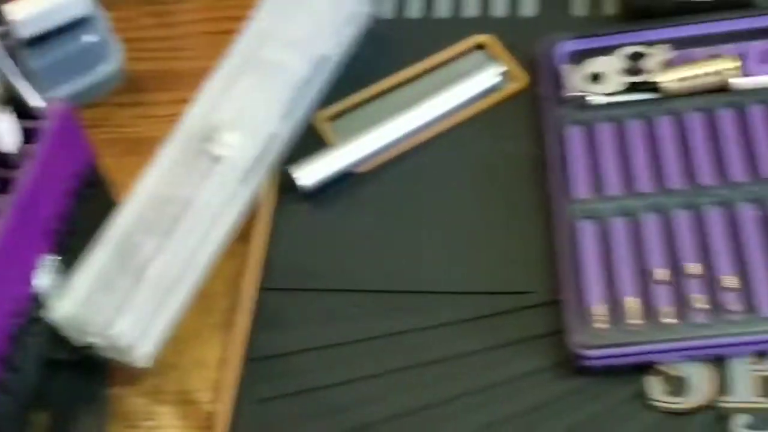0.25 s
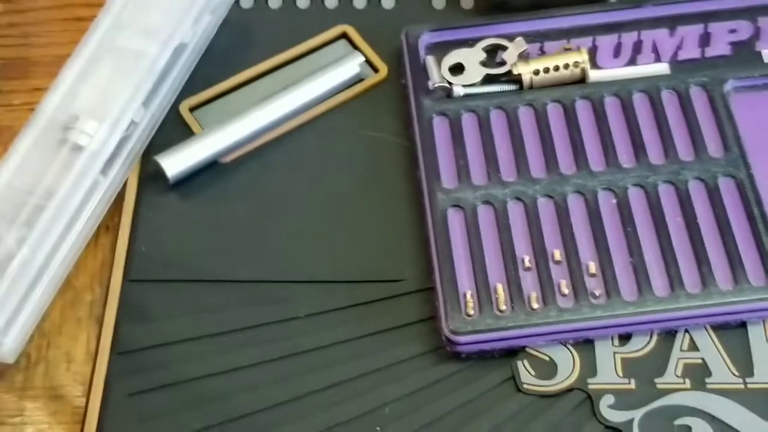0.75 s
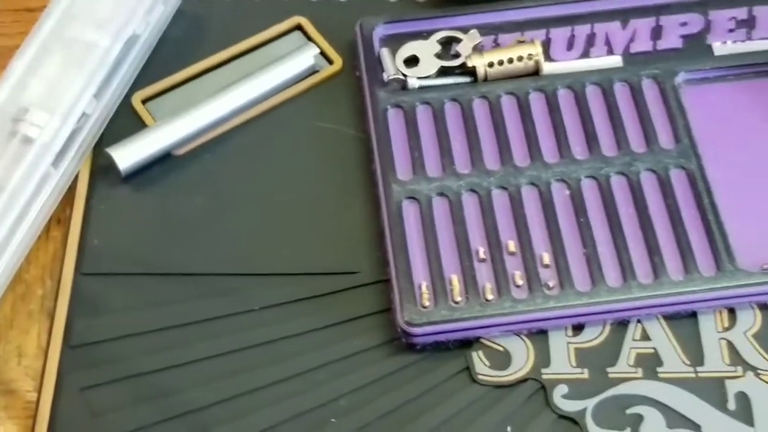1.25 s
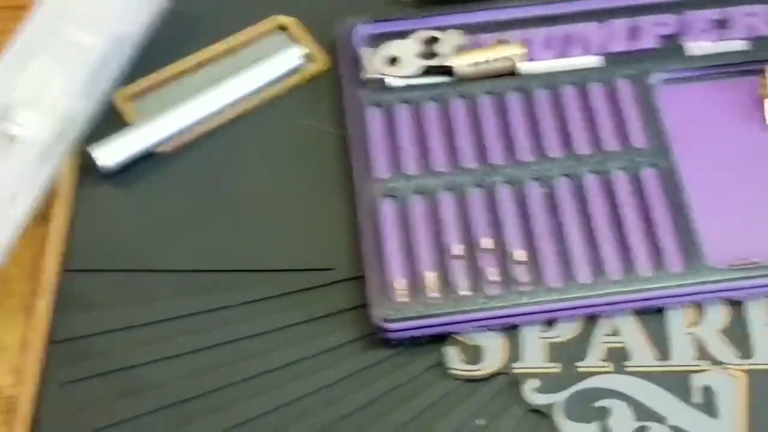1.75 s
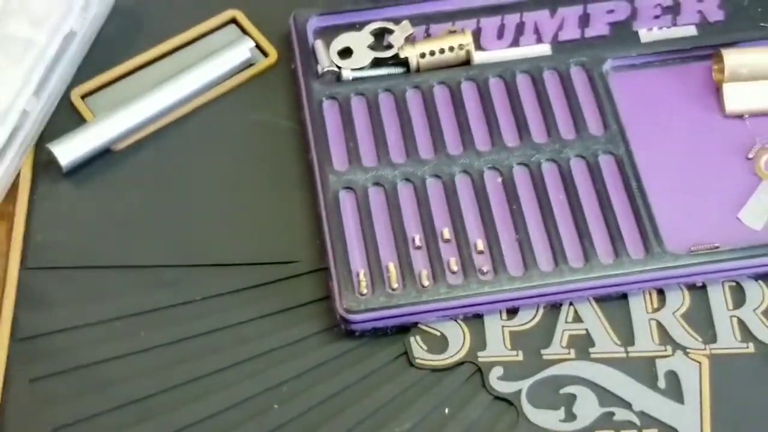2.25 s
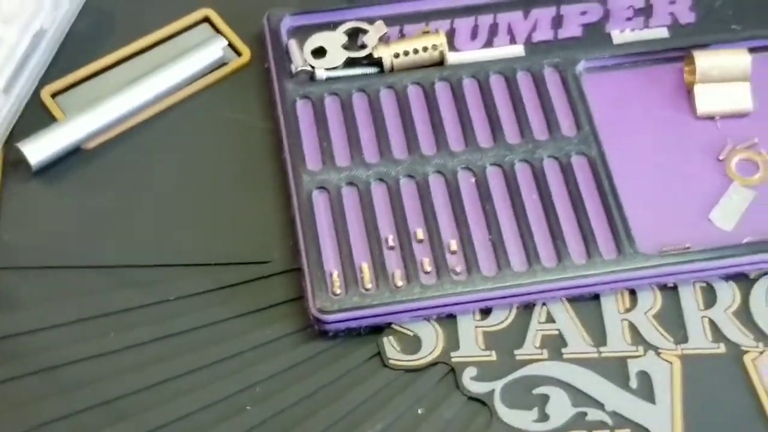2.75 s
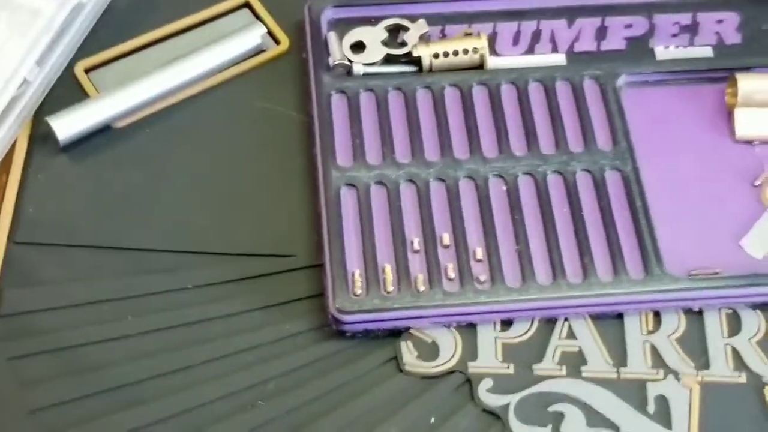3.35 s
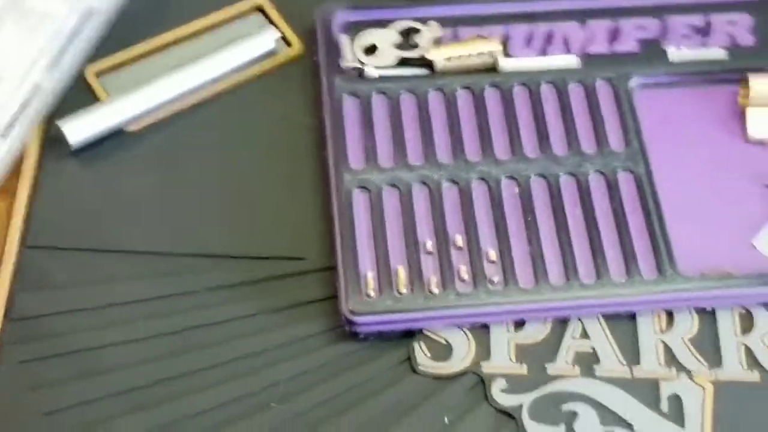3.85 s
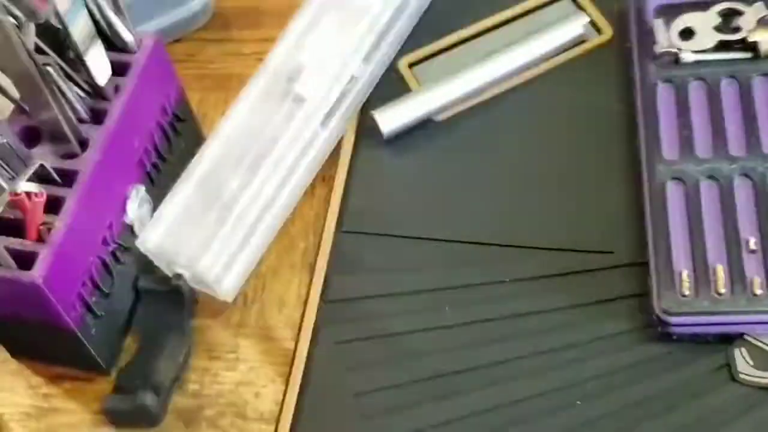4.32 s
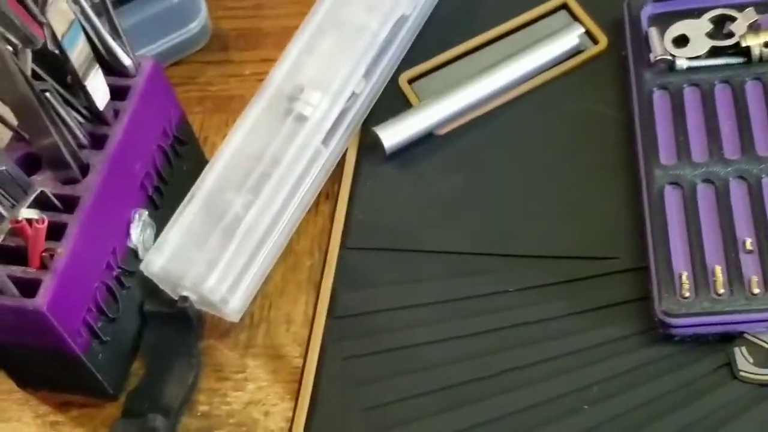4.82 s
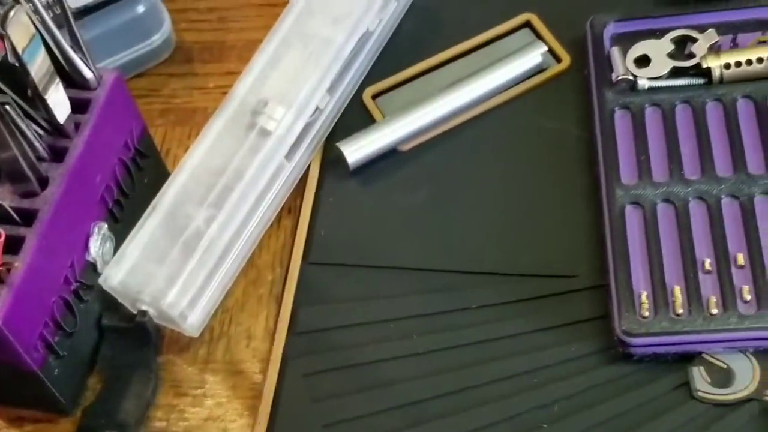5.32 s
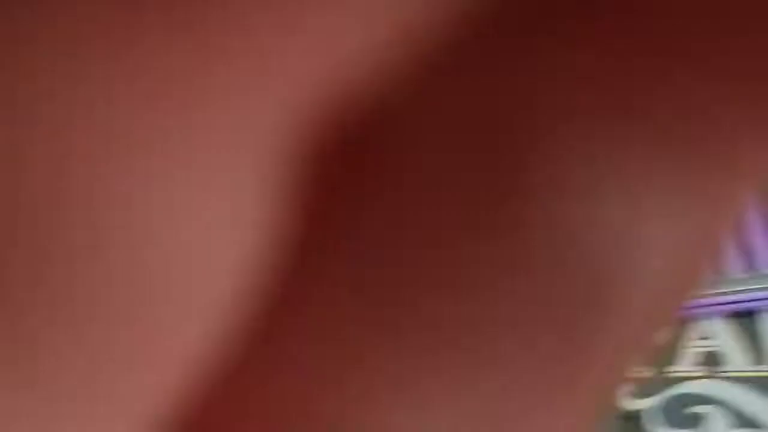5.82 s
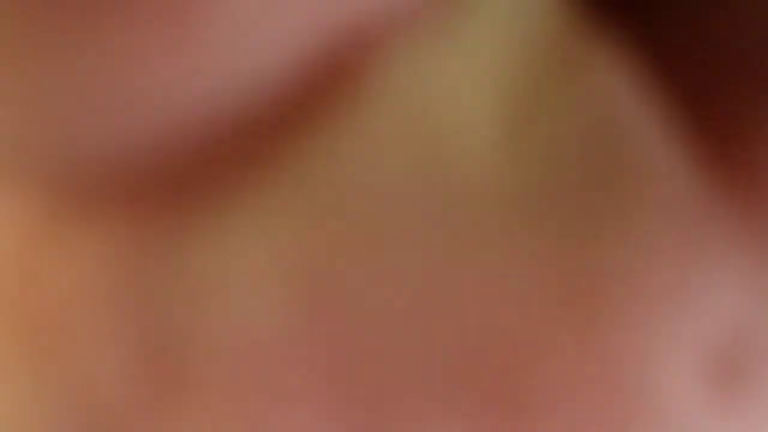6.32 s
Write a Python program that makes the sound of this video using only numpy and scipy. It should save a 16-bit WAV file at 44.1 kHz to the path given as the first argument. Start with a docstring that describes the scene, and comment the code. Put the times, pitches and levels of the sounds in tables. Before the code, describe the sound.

A hook-and-loop strap is peeled open in short, irregular tugs right next to the microphone, heard mostly on the left and only faintly on the right. It starts with light, dry crackling and scattered ticks, and a small creak of a hand on the camera at about 0.9 seconds. The sharpest rip comes at 1.6 seconds, followed by another around 2.2. Short crackles and crisp snaps of single hooks continue near 2.8 to 3.1 seconds, around 4.2 and 4.5, and again near 5.2. From about 5.5 seconds to the end at 6.6, the tearing and snapping get busier. Throughout, fingers shift on the camera body, giving soft, dull knocks, low rumble and rustle, with clearer bumps near 1.2, 1.6 and 5.2 seconds. Underneath is quiet indoor room tone, slight hiss and a very faint high whine.

```python
"""A hook-and-loop strap is peeled open in short tugs beside the left microphone port of a hand-held camera.
Single hooks snap free, and runs of them tear in a dense crackle that rings the taut strap.
The far port, on the right, hears the strap late and much quieter, with its mids scooped out.
The hand shifts, knocks and creaks on the case. Underneath lie low indoor room tone, hiss
and a faint whine near 7 kHz."""
import sys
import numpy as np
from scipy import signal
from scipy.fft import rfft, irfft
from scipy.io import wavfile
from scipy.ndimage import uniform_filter1d

SR = 44100
rng = np.random.default_rng(int(sys.argv[2]) if len(sys.argv) > 2 else 0)


def master_out(mix):
    """Clip the mix to full scale and print it as 16-bit PCM to the path in sys.argv[1]."""
    frames = np.transpose(np.atleast_2d(mix))
    ceiling = np.clip(frames, -1, 1)
    pcm = np.round(ceiling * 32767).astype(np.int16)
    wavfile.write(sys.argv[1], SR, pcm)


N = 290178

# EQ of the room tone: f/Hz, level/dB
ROOM_EQ = [(15, -38.5), (30, 4), (48, -6), (70, -6), (150, -14.5), (300, -13), (400, -45)]
# EQ of the near port: f/Hz, level/dB
NEAR_PORT_EQ = [(150, -47), (250, -10), (414, -15), (747, -10), (1400, -12.5), (1720, -8), (2190, -7.5),
                (3110, -2), (3830, -2.5), (4400, -1.5), (6110, -6), (7150, -5), (8660, -15), (11400, -6),
                (15900, -0.5)]
# EQ of the way round the case to the far port: f/Hz, level/dB
FAR_PORT_EQ = [(200, 12.5), (400, 14.5), (700, -2.5), (1200, -16.5), (2000, 1), (3200, -6.5), (6000, -4),
               (7300, 6.5), (12000, 1.5), (15500, 2)]
# glide of the creak: t/s, f/Hz, level/dB
CREAK_GLIDE = [(.865, 385, -70), (.89, 358, -63), (.91, 284, -59), (.93, 270, -65), (.945, 260, -85)]
# modes of the case: f/Hz, level/dB, t60/s
CASE_MODES = [(99, 0.5, 0.055), (123, -12, 0.07), (259, 4, 0.018), (459, -7, 0.042), (650, -2, 0.015)]
# fingers landing on the case: t/s, level before trim/dB, left over right/dB
FINGER_LANDINGS = [(1.148, -37, 2), (1.221, -36, 3), (1.613, -33, 7), (1.751, -48, 25), (1.81, -48.5, 8),
                   (2.102, -43.5, 18), (2.181, -43, 3), (2.547, -56.5, -1), (3.002, -52, 12),
                   (3.092, -42.5, 11), (3.506, -50, 7), (3.707, -52, 19.5), (4.202, -44, 21),
                   (4.28, -49.5, 12.5), (4.491, -45, 4.5), (4.545, -49.5, 16), (4.89, -58, 10),
                   (5.195, -38.5, 5.5), (5.521, -50.5, 3), (5.731, -63, -8), (5.783, -45.5, 18),
                   (6.133, -40, 13), (6.475, -44.5, -11), (6.539, -42, 11)]
# EQ of the handling rumble: f/Hz, level/dB
RUMBLE_EQ = [(29, -15), (50, 8), (108, 4), (250, -5), (320, -54.5), (550, -120)]
# envelope of the shifting hand: t/s, rumble before trim/dB, rustle re rumble before trim/dB
GRIP_ENVELOPE = [(0.0, -64, 0), (0.48, -82.5, -10), (1.61, -62, 4), (1.92, -70.5, -6), (2.16, -64.5, 0.5),
                 (2.56, -72, -8), (2.99, -68.5, -2.5), (3.32, -78.5, -3.5), (4.21, -66.5, -3),
                 (4.49, -78, -7), (5.31, -68.5, -1.5), (6.03, -69, 1), (6.27, -78, 9), (6.58, -77, 6.5)]
# thud, crackle and fizz bands of a hook: low f/Hz, high f/Hz
HOOK_BANDS = [(400, 1500), (1500, 8500), (8500, 18000)]
# modes of the taut strap: f/Hz, width/Hz, level/dB
STRAP_MODES = [(3050, 300, 4), (3500, 350, 1), (3970, 350, -3), (4700, 400, -4), (6100, 300, -14),
               (7400, 300, -18)]
# tugs, each timed at its hardest: t/s, build-up/s, let-go/s, crackle/dB,
# thud re crackle/dB, fizz re crackle/dB, squeak re crackle/dB, big-hook boost/dB
STRAP_TUGS = [(0,0.05,0.054,-48,8.5,-11,-25,-10.5), (0.08,0.037,0.042,-54,-5.5,0,-8,1),
              (0.2,0.14,0.187,-60,0.5,2,-17.5,-1.5), (0.351,0.048,0.048,-52.5,-4,-5,-27,0),
              (0.465,0.013,0.049,-63,-7,-1,-20,4.5), (0.6,0.031,0.11,-63.5,-6.5,2,-29,3.5),
              (0.719,0.016,0.03,-59.5,-6,1,-20,3), (0.84,0.019,0.021,-45.5,-4.5,-13,-15.5,-5),
              (0.9,0.05,0.028,-64.5,-5,-1,3,-1.5), (1.048,0.1,0.054,-57,-6,2.5,5,-3.5),
              (1.161,0.1,0.048,-56.5,-2.5,-1,4,-3), (1.227,0.019,0.018,-56,6,-16,1,-3),
              (1.32,0.062,0.13,-54,-22,-9,-39,0.5), (1.45,0.037,0.041,-43,-7.5,7,-25,-5.5),
              (1.606,0.033,0.031,-21.5,-23.5,-9,-12,-4.5), (1.66,0.21,0.068,-48,-8.5,15.5,-14,-7.5),
              (1.744,0.11,0.074,-50.5,-3.5,4.5,-0.5,-1), (1.855,0.06,0.037,-45.5,-8.5,-14,8,-5.5),
              (2.031,0.13,0.079,-56,-10,-8,-3,4.5), (2.124,0.055,0.039,-46.5,-17,3.5,-29,1),
              (2.236,0.064,0.065,-31.5,-22,6.5,-12.5,-12), (2.453,0.18,0.05,-56.5,-5.5,-15,6.5,-7),
              (2.53,0.042,0.092,-57.5,-35,-13,-13,-6), (2.651,0.046,0.12,-57.5,-22,0,-12,-4),
              (2.759,0.071,0.13,-47,-14.5,1,-27,-6.5), (2.883,0.027,0.066,-45,-6.5,-12,-22,0),
              (2.958,0.037,0.087,-50.5,-12,-8,-30,3), (3.109,0.073,0.34,-60,-4,-6,-9,5.5),
              (3.269,0.02,0.087,-60.5,-4,-1.5,-1.5,-1.5), (3.36,0.025,0.036,-57,-10,0,-30,2),
              (3.52,0.038,0.062,-45.5,-16.5,-7,-28,-3), (3.64,0.16,0.088,-65.5,-5.5,1,-25,2.5),
              (3.792,0.11,0.06,-56,-12,-2,-29,3.5), (3.922,0.04,0.038,-57.5,-21,2,-24,5),
              (3.98,0.035,0.025,-51,-16,-1,-25,8), (4.12,0.1,0.081,-49.5,-7.5,-3,-20,4.5),
              (4.235,0.034,0.083,-45.5,-3,-3,-22,-2), (4.281,0.04,0.082,-64,-9,-10,-17,3.5),
              (4.537,0.058,0.031,-42.5,-5.5,-4,-17.5,-4), (4.651,0.15,0.066,-67.5,-4,-11.5,-22,-3.5),
              (4.773,0.034,0.056,-46.5,-7,-2.5,-31.5,0.5), (4.86,0.07,0.076,-56.5,-2.5,-3,-20,1),
              (4.96,0.048,0.044,-40.5,-3,-5,-37,-7.5), (5.11,0.067,0.12,-47.5,-5,-16,-27,-6),
              (5.199,0.023,0.029,-43,-19,-17,-30,1.5), (5.29,0.084,0.16,-63,-0.5,-2.5,-27,1.5),
              (5.461,0.086,0.11,-45,-4.5,-2,-28,-1.5), (5.535,0.024,0.039,-44.5,-15,-4,-23,-4),
              (5.68,0.1,0.19,-59.5,-7,-2,-20.5,5.5), (5.791,0.1,0.22,-54.5,-16,-19,-18.5,-3),
              (5.93,0.13,0.18,-51,-7,2.5,-24,5.5), (6.03,0.15,0.053,-49.5,-8,-4,-24,6),
              (6.13,0.1,0.053,-43,-8,-11,-23,-2), (6.199,0.071,0.061,-46,-8.5,-21,-10,-8),
              (6.37,0.042,0.33,-65.5,-6,1.5,-26,6), (6.483,0.031,0.045,-47,-12,-8,-18,2.5),
              (6.565,0.018,0.066,-52,-3,-6,-15,16)]
# floor as the strap creeps between tugs: crackle/dB, thud/dB, fizz/dB, squeak/dB, big hooks/dB
STRAP_CREEP = [-72, -95.5, -73.5, -105, -81]
# single hooks snapping free: t/s, crack peak/dB, thud re crack/dB, fizz re crack/dB, ring f/Hz
HOOK_SNAPS = [(0.0534, -26.5, -36, -2, 2860), (0.087, -35, -17, -14, 3200), (0.138, -28.5, -23, 0, 7500),
              (0.171, -36.5, -9, -17, 3560), (0.3401, -33.5, -1, 11, 3010), (0.3592, -13, -12, -5, 3520),
              (0.3652, -24, -6, 6, 2990), (0.6693, -23, -15, -6, 3130), (1.079, -33.5, -9, 2, 3010),
              (1.3143, -22.5, -11.5, -0.5, 3090), (1.4013, -32, -10, -20, 4830), (1.55, -18, -12, -2, 4260),
              (1.565, -21.5, -21, -10, 2000), (1.5876, -7, -12, -1, 4930), (1.5911, -20, -25, -8, 4600),
              (1.609, 0, -30, -24, 4240), (1.613, -18, -17, -14, 4480), (1.691, -26.5, -4.5, 20, 3180),
              (1.7285, -16.5, -5, -17, 3300), (1.739, -12, -14.5, -1.5, 3340),
              (1.7495, -23.5, -34, -12, 5700), (1.8389, -26.5, -11, -23, 3840),
              (2.1004, -22, -3.5, -13, 2970), (2.1077, -5.5, -12.5, -19, 2850), (2.1109, -16, -9, 2, 3360),
              (2.1413, -20, -11, -15, 3150), (2.2085, -21.5, -16, 7, 7100), (2.2502, -6, -29, -8, 2865),
              (2.561, -38, -12, 6, 4470), (2.6398, -33.5, -15, -7, 4840), (2.752, -11, -33, -7, 3630),
              (2.8679, -21, -16, -10, 4360), (2.8754, -25.5, -11, 10, 4400), (2.8815, -15.5, -21, 2, 2690),
              (2.9152, -31.5, -8, -2, 3680), (2.9476, -29, -7.5, 6.5, 3830), (2.9726, -32.5, -5, 6, 3100),
              (3.022, -11, -7, -1.5, 3060), (3.0991, -9, -3, -6, 3060), (3.1169, -8, -5, -5.5, 3000),
              (3.1565, -32.5, -1, 0, 3380), (3.178, -39, -4, -7, 3570), (3.2245, -26.5, -33, -4, 7740),
              (3.3674, -38.5, -32, 2.5, 4840), (3.4856, -31, -38, -2, 4900), (3.5041, -21, -19, 10, 3770),
              (3.523, -26.5, -6, 9, 2730), (3.5469, -25.5, -23, -5, 4930), (3.6704, -35.5, -28, -13, 5500),
              (3.745, -24, -16.5, 0, 7100), (3.785, -27, -17, 3.5, 6050), (3.9096, -32.5, -38, -7, 5700),
              (3.9739, -23, -15.5, -7, 6260), (4.0284, -15.5, -22, 9.5, 7400), (4.0647, -33, -9, 12, 5680),
              (4.122, -28, -4.5, 9.5, 3760), (4.1259, -22.5, -25, 8, 4830), (4.1716, -15, -10.5, 2.5, 2800),
              (4.207, -21.5, -6.5, 8, 3700), (4.2085, -10, -29, 2, 1640), (4.225, -17, -8, -3, 3220),
              (4.234, -16.5, -15, 10.5, 4470), (4.2465, -26, -5, 5, 2950), (4.288, -9.5, -7, 2.5, 2980),
              (4.34, -37.5, -12, -3, 3000), (4.479, -30.5, -9, -36, 3000), (4.4985, -29, -19.5, -16, 2860),
              (4.5264, -16.5, -10, -3, 3230), (4.5352, -14, -6, -26, 4000), (4.549, -11, -7.5, -4, 3080),
              (4.7111, -40, -37, -4, 4150), (4.7736, -27, -7.5, -14, 4550), (4.8195, -29, -5, -2, 4670),
              (4.8702, -36, -11, -19, 3100), (4.8965, -11.5, -10, 1, 3340), (4.909, -38, -20, 7, 5000),
              (5.1493, -22, -28, -4, 3640), (5.195, -15.5, -46, 3.5, 2480),
              (5.1973, -19.5, -14.5, -1, 2430), (5.2105, -29.5, -21, 4, 2370),
              (5.4309, -24.5, -9.5, -20, 5350), (5.4819, -28, -9, 14.5, 5660), (5.5, -23.5, -13, 3, 3960),
              (5.5254, -21, -5.5, 10, 5500), (5.5454, -17, -14.5, 7, 3630), (5.737, -13, -8.5, 11, 5600),
              (5.7568, -15.5, -20, -2, 8600), (5.7697, -23, -9, -16, 3120), (5.7856, -9, -8, 3.5, 3420),
              (5.7982, -9.5, -9, -6, 3340), (5.8177, -15, -10, 1, 5900), (5.8572, -18, -11.5, 3, 6000),
              (5.872, -30, -10, 0, 4020), (5.9086, -28, -9, 7, 3660), (6.0161, -9.5, -13, 4.5, 3670),
              (6.0195, -17, -6, 0, 3640), (6.029, -28, -26, -13, 3270), (6.084, -35, -2, 9, 3730),
              (6.1055, -9, -11, 1.5, 3370), (6.1395, -10, -4, 2, 2830), (6.152, -24, -29, -6, 4590),
              (6.1893, -15, -7.5, -3, 5200), (6.1936, -23, -9, 5, 4650), (6.226, -32.5, -20, 0, 4500),
              (6.3454, -26.5, -48, -9, 6140), (6.4791, -12.5, -15, 7, 5900), (6.541, -11.5, -20, 0.5, 5400),
              (6.5456, -7.5, -4, -23, 3570), (6.5621, -7.5, -10, -1, 2800), (6.57, -22, -9, -7, 3320)]


def from_db(db):
    """Decibels to gain."""
    return 10 ** (np.asarray(db) / 20)


def rms_one(x):
    """Normalises to rms 1."""
    return x / np.sqrt(np.mean(x ** 2) + 1e-20)


def envelopes(rows):
    """Breakpoint rows to one curve per column, sample by sample."""
    times, *columns = np.transpose(rows)
    return [np.interp(np.arange(N) / SR, times, column) for column in columns]


def impulse_response(eq, size=4096):
    """Minimum-phase response of an EQ curve: no pre-ring."""
    hz, level_db = np.transpose(eq)
    grid_hz = np.maximum(np.arange(size // 2 + 1) * SR / size, 1)
    gain = from_db(np.interp(np.log(grid_hz), np.log(hz), level_db))
    cepstrum = irfft(np.log(gain))
    cepstrum[1:size // 2] *= 2
    cepstrum[size // 2 + 1:] = 0
    return irfft(np.exp(rfft(cepstrum)))


def colour(x, eq):
    """Plays a sound through an EQ curve."""
    return signal.fftconvolve(x, impulse_response(eq))[:len(x)]


def band(x, edges_hz):
    """Band-pass."""
    return signal.sosfilt(signal.butter(2, edges_hz, "band", fs=SR, output="sos"), x)


def three_bands(x):
    """Thud, crackle and fizz; polarity alternates so that neighbours add at the crossovers."""
    return [(-1) ** (k + 1) * band(x, edges) for k, edges in enumerate(HOOK_BANDS)]


def resonance(x, hz, width_hz):
    """Two-pole resonator, unity gain at its peak."""
    r = np.exp(-np.pi * width_hz / SR)
    poles = [1, -2 * r * np.cos(2 * np.pi * hz / SR), r * r]
    return signal.lfilter(np.array([1, 0, -1]) * (1 - r * r) / 2, poles, x)


def drift(rate_hz):
    """Smooth random modulation, rms 1."""
    r = np.exp(-2 * np.pi * rate_hz / SR)
    return rms_one(signal.lfilter([1], [1, -2 * r, r * r], rng.standard_normal(N + SR))[SR:])


def flicker(swing_db, window):
    """Turns a dB swing into a gain whose mean power stays near 1 over window samples."""
    gain = from_db(swing_db)
    return gain / np.sqrt(uniform_filter1d(gain ** 2, size=window))


def noise_bed(eq, levels_db):
    """Steady room tone or hiss, unrelated at the two ports."""
    return np.array([from_db(db) * rms_one(colour(rng.standard_normal(N), eq)) for db in levels_db])


def whine(hz=6708, waver_hz=2.5, levels_db=(-84.5, -85), fade_db_per_s=0.6, on_s=0.45, off_s=6.0):
    """A thin whine switches on, wavers in pitch as it slowly fades, and switches off."""
    tone = np.sin(2 * np.pi * np.cumsum(hz + waver_hz * drift(11)) / SR)
    gate, = envelopes([(on_s - 0.05, 0), (on_s, 1), (off_s, 1), (off_s + 0.05, 0)])
    fade = from_db(-fade_db_per_s * np.arange(N) / SR)
    return from_db(levels_db)[:, None] * fade * gate * rms_one(tone)


def creak(rough_db=5):
    """The hand creaks on the case: a short, rough, falling tone, alike at both ports."""
    hz, level_db = envelopes(CREAK_GLIDE)
    t = np.arange(N) / SR
    gate = (t > CREAK_GLIDE[0][0]) & (t < CREAK_GLIDE[-1][0])
    tone = np.sin(2 * np.pi * np.cumsum(hz) / SR)
    return gate * from_db(level_db + rough_db * drift(40)) * tone


def knocks(trim_db=-4, scatter_db=1.9):
    """Each finger landing strikes every case mode, with its own strength and polarity at each port."""
    times, level_db, pan_db = np.transpose(FINGER_LANDINGS)
    port_db = level_db + trim_db + np.outer([0.5, -0.5], pan_db)
    shape = (len(times), len(CASE_MODES), 2)
    strengths = rng.choice([-1, 1], shape) * from_db(rng.normal(0, scatter_db, shape))
    out = np.zeros((2, N))
    for k, (hz, mode_db, t60) in enumerate(CASE_MODES):
        blows = np.full((2, N), 1e-18)
        blows[:, (times * SR).astype(int)] = strengths[:, k].T * from_db(port_db + mode_db)
        r, w = from_db(-60 / (t60 * SR)), 2 * np.pi * hz / SR
        out += signal.lfilter([0, np.sin(w)], [1, -2 * r * np.cos(w), r * r], blows)
    return band(out, (40, 900))   # soft fingertips give no treble


def grip(shared=0.15, lump_db=3.5, lump_hz=21, trim_db=6, rustle_trims_db=(-5, -7),
         follow=0.37, easy_pull_db=-58.5):
    """Shifting fingers shake the two ports, little alike: lumpy rumble and a dull rustle."""
    rumble_db, rustle_db = envelopes(GRIP_ENVELOPE)
    rustle_db += follow * (tug_envelopes()[0] - easy_pull_db)   # the rustle rides the tugs
    common, *port_noises = rng.standard_normal((3, N))
    lumps = flicker(lump_db * drift(lump_hz), window=4000)
    out = []
    for noise, port_db in zip(port_noises, rustle_trims_db):
        shake = np.sqrt(shared) * common + np.sqrt(1 - shared) * noise
        rumble = rms_one(lumps * colour(shake, RUMBLE_EQ))
        rustle = from_db(rustle_db + port_db) * rms_one(lumps ** 2 * band(shake, (160, 600)))
        out.append(from_db(rumble_db + trim_db) * (rumble + rustle))
    return np.array(out)


def round_the_case(x, lag_s=0.0005):
    """Sound bends round the case and reaches the far port late and hollow in the mids."""
    delayed = np.concatenate([np.zeros(round(lag_s * SR)), x])[:N]
    return colour(delayed, FAR_PORT_EQ)


def tug_envelopes(depth_db=18.5, build_power=1.7, let_go_power=1.53):
    """Tugs swell, let go and add in power over the creep: crackle in dB, then the rest re crackle."""
    t = np.arange(0, N / SR, 0.001)
    peak_s, build_s, let_go_s, peak_db, *offsets_db = np.transpose(STRAP_TUGS)[:, :, None]
    from_peak = np.abs(t - peak_s) / np.where(t < peak_s, build_s, let_go_s)
    drop_db = depth_db * from_peak ** np.where(t < peak_s, build_power, let_go_power)
    tugs_db = np.maximum(peak_db - drop_db, -200)
    powers = [np.sum(from_db(tugs_db + db) ** 2, axis=0) + from_db(creep_db) ** 2
              for db, creep_db in zip([0] + offsets_db, STRAP_CREEP)]
    crackle_db, *others_db = 10 * np.log10(powers)
    return envelopes(np.transpose([t, crackle_db] + [db - crackle_db for db in others_db]))


def tear(hooks_per_s=12000, size_db=2.5, big_per_s=140, big_db=15, jerk_db=2.43, jerk_hz=44.5,
         flutter_db=2, flutter_hz=150, bend_db=3, bend_hz=14, patchy_db=4.5, patchy_hz=25.8, alike=0.18):
    """Small hooks release in their thousands, a few big ones among them; the pull jerks, so they clump."""
    crackle_db, thud_db, fizz_db, squeak_db, boost_db = tug_envelopes()
    small = from_db(size_db * np.minimum(rng.exponential(1, N), 6))
    small *= rng.random(N) < hooks_per_s / SR
    sliding = np.clip(from_db(squeak_db), 0, 1)   # a sliding, squeaking strap tears few big hooks
    big = from_db(big_db + boost_db + rng.normal(0, 4.2, N))
    big *= rng.random(N) < (1 - sliding) * big_per_s / SR
    near_signs, other_signs = rng.choice([-1, 1], (2, N))
    jerk = flicker(jerk_db * drift(jerk_hz) + flutter_db * drift(flutter_hz), window=1500)
    # the strap bends, so its modes take turns; the colour of the crackle shifts too
    bends = [from_db(bend_db * drift(bend_hz)) for _ in STRAP_MODES]
    patches = [flicker(patchy_db * drift(patchy_hz), window=2500) for _ in HOOK_BANDS]
    far_signs = np.where(rng.random(N) < alike, near_signs, other_signs)   # the ports only partly agree
    ports = []
    for signs in (near_signs, far_signs):
        releases = (small + big) * signs
        squeak = sum((-1) ** k * from_db(db) * bends[k] * resonance(releases, hz, width_hz)
                     for k, (hz, width_hz, db) in enumerate(STRAP_MODES))
        bands = three_bands(colour(releases, NEAR_PORT_EQ))
        layers = zip(bands + [squeak], (thud_db, 0, fizz_db, squeak_db), patches + [1])
        mix = sum(from_db(db) * rms_one(patch * layer) for layer, db, patch in layers)
        ports.append(from_db(crackle_db) * jerk * mix)
    near, far = ports
    far_loss_db = 27.5 + 0.1469 * crackle_db
    return np.array([near, from_db(-far_loss_db) * far])


def snaps(spatter=0.1, t60_s=0.012, smear_s=0.0037, ring_db=9.5, ring_width_hz=970, length=768):
    """A hook lets go with a sharp click and a dying spatter, and takes its own paths to the far port."""
    t = np.arange(length) / SR
    near_port = impulse_response(NEAR_PORT_EQ)[:length]
    noises, paths = rng.standard_normal((len(HOOK_SNAPS), 2, length)).transpose(1, 0, 2)
    paths = paths * np.exp(-t / smear_s)
    rings = from_db(ring_db + 4.5 * rng.standard_normal(len(HOOK_SNAPS)))   # some ring, some are dry
    out = np.zeros((2, N + length))
    for (start_s, peak_db, thud_db, fizz_db, hz), noise, path, ring in zip(HOOK_SNAPS, noises, paths, rings):
        release = spatter * noise * from_db(-60 * t / t60_s)
        release[0] = 1   # the click
        thud, crack, fizz = three_bands(signal.fftconvolve(release, near_port)[:length])
        crack = crack + ring * resonance(crack, hz, ring_width_hz)   # the freed strap rings briefly
        layers = zip((thud, crack, fizz), (thud_db, 0, fizz_db))
        near = sum(from_db(peak_db + db) * layer / np.abs(layer).max() for layer, db in layers)
        far = signal.fftconvolve(near, path / np.linalg.norm(path))[:length]
        far_loss_db = 23 + 0.17 * peak_db - 0.23 * fizz_db
        at = int(start_s * SR)
        out[:, at:at + length] += [near, from_db(-far_loss_db) * far]
    return out[:, :N]


def scene():
    """The strap, close on the left, over handling noise and a quiet bed."""
    near, far = snaps() + tear()
    strap = np.array([near, round_the_case(far)])
    bed = whine()
    bed += noise_bed(ROOM_EQ, levels_db=(-76.5, -73.5))   # room tone
    bed += noise_bed(NEAR_PORT_EQ, levels_db=(-89, -91))   # hiss
    return strap + grip() + knocks() + creak() + bed


def record(dry, cutoff_hz=17140):
    """Soft clipping rounds off the loudest snaps; a steep low-pass cuts the top."""
    low_pass = signal.cheby2(14, 85, cutoff_hz, fs=SR, output="sos")
    return signal.sosfilt(low_pass, np.tanh(dry))


dry = scene()
out = record(dry)
master_out(out)
```